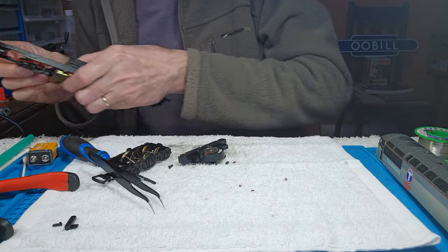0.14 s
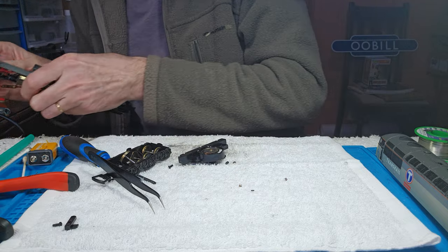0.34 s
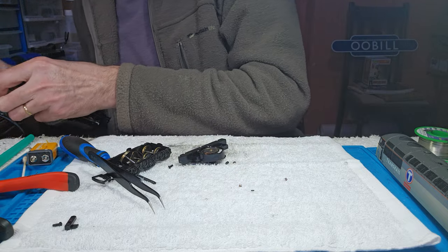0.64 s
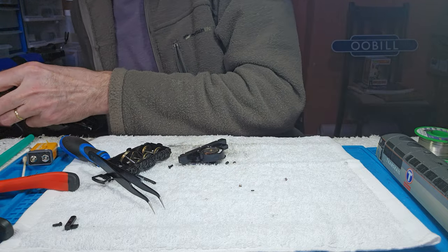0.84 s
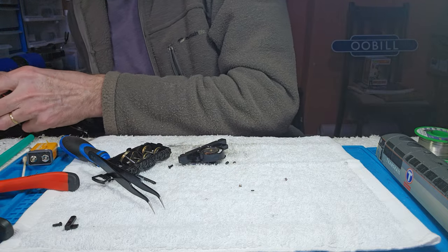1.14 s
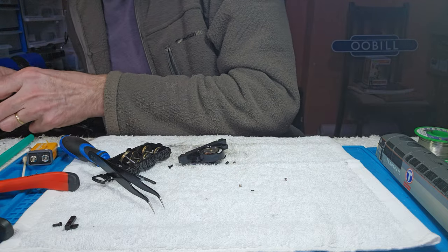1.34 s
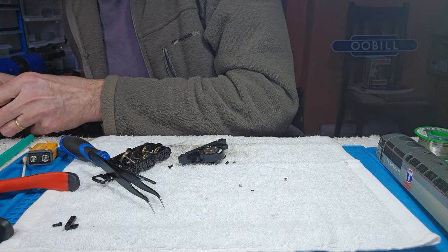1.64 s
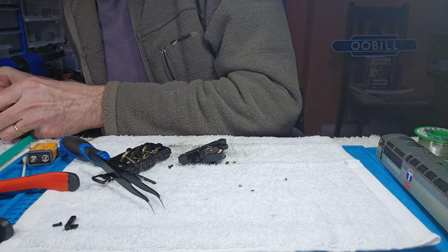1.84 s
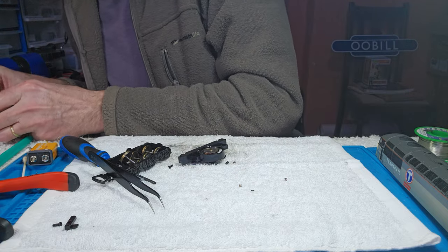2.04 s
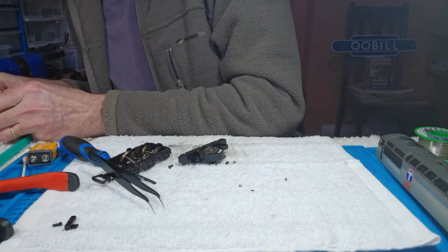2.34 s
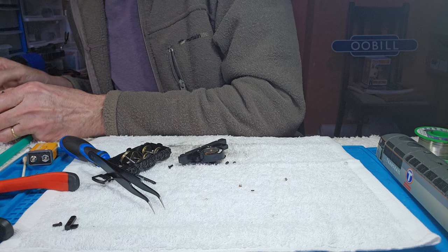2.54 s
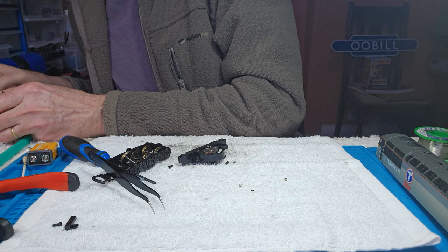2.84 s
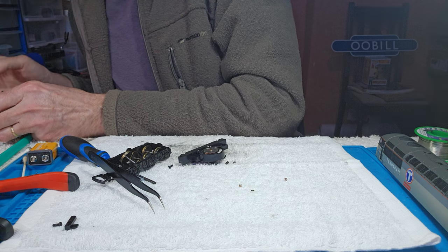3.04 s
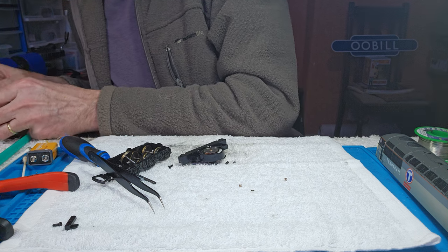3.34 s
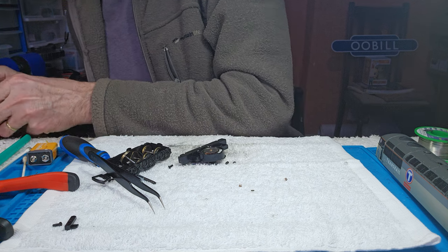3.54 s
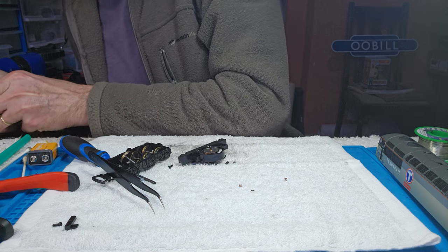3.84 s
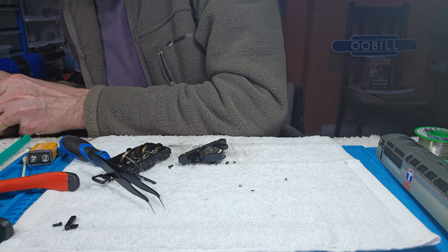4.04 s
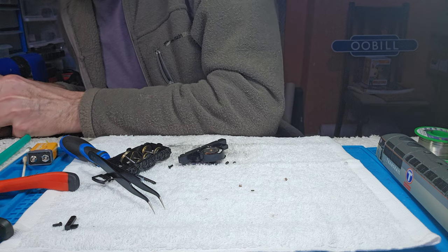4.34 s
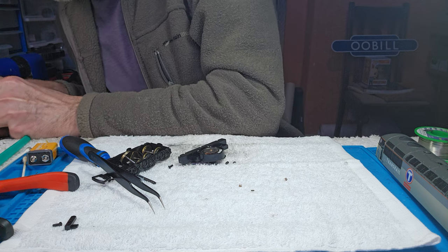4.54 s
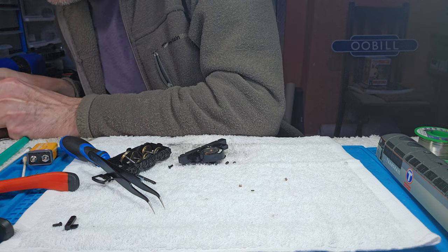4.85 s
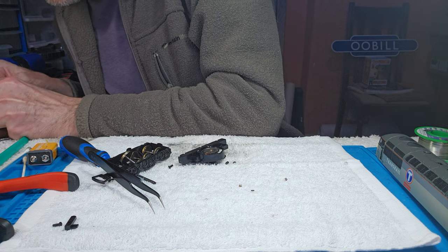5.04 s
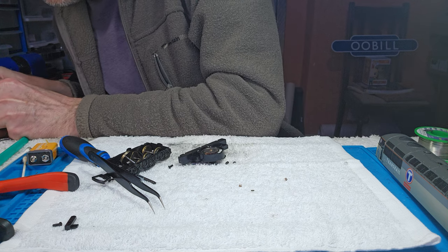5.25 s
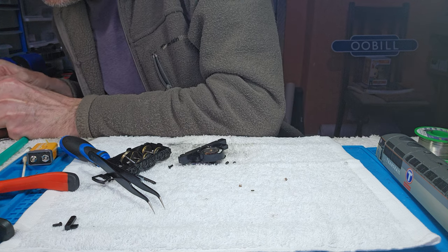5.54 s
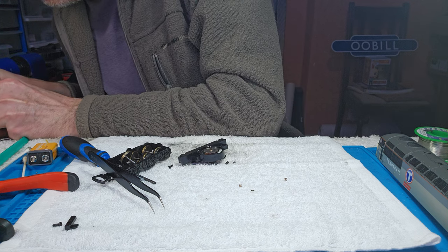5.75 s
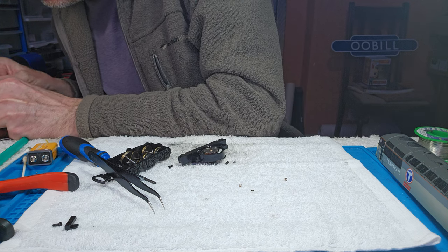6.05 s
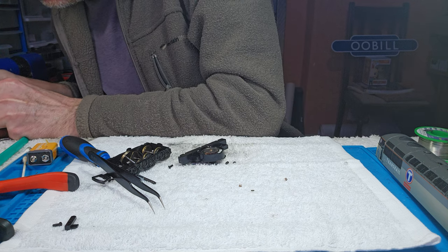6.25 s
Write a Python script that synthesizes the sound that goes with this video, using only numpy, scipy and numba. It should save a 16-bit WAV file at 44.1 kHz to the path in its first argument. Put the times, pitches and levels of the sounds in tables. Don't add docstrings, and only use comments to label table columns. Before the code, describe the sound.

Quiet rubbing and light metal ticks give way to hard, bright vise clanks around three seconds, then softer rattles and one sharp closing knock indoors.

```python
import sys
import numpy as np
from scipy import signal
from scipy.fft import rfft, irfft, next_fast_len
from scipy.io import wavfile
from scipy.ndimage import uniform_filter1d
from numba import njit

SR = 44100
rng = np.random.default_rng(int(sys.argv[2]) if len(sys.argv) > 2 else 0)


def unload_wav(signal):
    wavfile.write(
        sys.argv[1],
        SR,
        np.round(np.clip(np.atleast_2d(signal).T, -1, 1) * 32767).astype(np.int16),
    )


def invert_db(level):
    return 10 ** (np.asarray(level, dtype=float) / 20)


N = 282636
KNOCK_LEN = 9000
TAIL = 4096
BAR_CROWD_T60_S = .095

# pitch_hz, level_db, t60_s
BENCH_MODES = [(144, -0.5, .3), (241.4, -5, 0.17), (250.2, -3.5, 0.28), (331.7, -10, 0.11), (345, 6.5, 0.1),
               (427, -6.5, 0.29), (562.3, -13.5, .1), (673.5, -6.5, 0.13), (881, 4, 0.095)]
BODY_MODES = [(1381, 4.5, 0.023), (1656, -3, 0.11), (1947, -25.5, .06), (2455, -24.5, .06),
              (2760, -14.5, 0.11), (2820, -7.5, 0.083), (3414, -7, 0.011), (3900, -24.5, .07)]
BAR_MODES = [(7900, -15.5, 0.022), (8225, 1.5, .035), (10750, -3, 0.04), (10570, 1, 0.016),
             (13500, -19, .03), (15100, -9.5, .03)]
# (pitch_hz, level_db)
BODY_CROWD = (0.14, 1, [(600, -27), (1200, 5), (2100, 9), (2500, -1.5), (2850, 4.5), (3200, -3.5),
              (3700, 2), (4050, -5), (4400, -10.5), (6500, -21), (9000, -31.5)])
BAR_CROWD = (BAR_CROWD_T60_S, -1.5, [(4000, -32), (5200, -24), (6500, -8), (7700, 1.5), (8300, 11.5),
             (9600, -4), (10700, 9), (11600, -11), (13500, -7.5), (14500, -6), (15300, 1), (16000, -8.5)])


def unit(x):
    return x / np.sqrt(np.mean(x ** 2))


def add(out, sound, s, db):
    i = int(s * SR)
    out[:, i:i + KNOCK_LEN] += sound * invert_db(db) / np.abs(sound).max()


def envelope(points, **ends):
    return invert_db(np.interp(np.arange(N) / SR, *np.transpose(points), **ends))


def colour(points, size):
    hz, db = np.transpose(points)
    f = np.maximum(np.arange(size // 2 + 1) * SR / size, 1)
    return invert_db(np.interp(np.log(f), np.log(hz), db))


def hiss(points):
    span = next_fast_len(N, True)
    spectrum = rfft(rng.standard_normal((2, span))) * colour(points, span)
    return unit(irfft(spectrum, span)[:, :N])


@njit
def ring(x, pole, gain):
    out = np.zeros((2, len(x)))
    for m in range(len(pole)):
        z = 0j
        for i in range(len(x)):
            z = z * pole[m] + x[i]
            out[0, i] += (gain[0, m] * z).imag
            out[1, i] += (gain[1, m] * z).imag
    return out


def struck(x, modes, chance, scatter_db, unlike):
    hz, db, t60 = np.transpose(modes)
    life = np.maximum(t60, .003)
    detune, scatter, port_level, port_phase = chance[:4 * len(hz)].reshape(4, -1)
    pole = np.exp(2j * np.pi * hz * (1 + 0.006 * detune) / SR - np.log(1000) / (life * SR))
    weight = invert_db(db + min(scatter_db, 4) * scatter) / np.sqrt(life)
    ports = np.exp(np.outer([1, -1], unlike * (0.14 * port_level + 1j * port_phase)))
    return ring(x + 1e-18, pole, weight * ports)


def crowd(x, part, alike, size=TAIL):
    t60, db, points = part
    fade = np.exp(-np.log(1000) * np.arange(size) / SR / max(t60, .01))
    tail = rng.standard_normal((3, size)) * fade
    tail = alike * tail[0] + np.sqrt(1 - min(alike, 1) ** 2) * tail[1:]
    span = next_fast_len(len(x) + size, True)
    spectrum = rfft(x, span) * rfft(tail, span) * colour(points, span)
    return invert_db(db) * unit(irfft(spectrum, span)[:, :len(x)])


def chatter(length_s, chance, soft_s):
    t = np.arange(KNOCK_LEN) / SR
    fade = np.exp(-t / max(length_s, .0005)) + 9.2 * np.exp(-t / 0.0013)
    return chance * chance * chance * fade * (1 - np.exp(-t / soft_s))


def air():
    # pitch_hz, level_db (per Hz)
    air_colour = [(18, -9), (48, 14.5), (259, 9), (988, -24), (1190, -15), (5310, -20.5), (6380, -16.5),
                  (14800, -16), (16000, -19.5)]
    return hiss(air_colour) * invert_db(-71)


def room(vice):
    # (pitch_hz, level_db)
    echo = (0.36, -11.5, [(100, -7), (500, -6.5), (4000, -2.5), (6000, -7), (16000, -21)])
    treble_echo = (0.25, -20.5, [(3000, -40), (6000, -2.5), (16000, 0)])
    sent = vice.mean(axis=0)
    bright = signal.sosfilt(signal.butter(4, 5000, "high", fs=SR, output="sos"), sent)
    tail = crowd(sent, echo, 0.3, size=4 * TAIL) + crowd(bright, treble_echo, 0.22, size=4 * TAIL)
    return tail * vice.std()


def sleeve():
    # start_s, level_db
    moves = [
        [(0.0, -69.5), (0.11, -80.5), (0.148, -70.5), (0.296, -86.5), (0.318, -68), (0.46, -94), (0.632, -101),
         (0.638, -80.5), (0.8, -104)],
        [(1.19, -76), (1.27, -84), (1.28, -71), (1.5, -95), (1.63, -72.5), (1.89, -66.5)],
        [(1.9, -66), (1.93, -73), (2.266, -65), (2.372, -76), (2.394, -65), (2.4, -108)],
        [(3.58, -72.5), (3.738, -75), (3.756, -69), (3.78, -55)],
        [(2.56, -90), (2.562, -66), (2.59, -80)],
        [(5.531, -90), (5.535, -56.5), (5.575, -70)],
        [(3.9, -92), (3.905, -70), (3.93, -82)],
    ]
    # pitch_hz, level_db (per Hz)
    cloth_colour = [(590, -47), (1000, -19.5), (1250, -3.5), (2250, 5), (2710, 3.5), (4070, 9), (5570, 2),
                    (16000, -8.5)]
    gain = sum(envelope(move, left=-120, right=-120) for move in moves)
    return hiss(cloth_colour) * uniform_filter1d(gain, 600) * invert_db(8.0)


def slip():
    # centre_s, half_length_s, level_db, lowest_hz
    puff = (.165, .035, -60, 12000)
    s, half_s, db, hz = puff
    shape = np.exp(-((np.arange(N) / SR - s) / half_s) ** 2)
    return hiss([(0.24 * hz, -25), (hz, -6), (16000, 0)]) * invert_db(db) * shape


def carry():
    # start_s, level_db
    hum_level = [(0, -60), (.09, -63.5), (0.151, -54.5), (.2, -58.5), (.23, -80), (.26, -62.5), (.34, -71),
                 (.4, -67.5), (.8, -89)]
    # pitch_hz, level_db, t60_s
    hum_modes = [(370, 1.5, 0.061), (442.5, -3, 0.041), (740, -12.5, 0.05), (1235, -1.5, .04),
                 (1500, -11.5, 0.058), (2050, -8, .06)]
    hum = unit(struck(rng.standard_normal(N), hum_modes, rng.standard_normal(24), 0, 0.33))
    return hum * envelope(hum_level, right=-120)


def all_knocks():
    # start_s, body_peak_db, bench_db, bar_db (above body), chatter_s
    slams = [(2.4118, -20, -11, -7.5, 0.011), (2.6877, -23.5, -2.5, -16.5, 0.0065),
             (2.767, -22.5, -6.5, -30, 0.013), (2.7783, -23.5, -6.5, -54, 0.028),
             (2.9262, -19, -8, -37.5, 0.0049), (2.953, -10.5, -12, -15, 0.018),
             (2.9838, -11.5, -13.5, -15.5, 0.015), (3.204, -11, -7.5, -11, 0.025),
             (3.264, -4, -19, -22, 0.0074), (3.301, -15, -8, -14.5, 0.014), (3.5062, -22, -9, -42, 0.0041),
             (5.072, -22, -9, -48.5, 0.013), (5.0864, -24, -10.5, -28, 0.0074),
             (5.3875, -22.5, -12, -50.5, 0.0027), (5.4888, -25.5, -10, -21.5, 0.0061),
             (5.995, -23, -8.5, -15, 0.0051), (6.325, -10.5, -9, -36.5, 0.0055)]
    # start_s, body_peak_db, bar_db (above body), chatter_s
    clacks = [(0.0464, -53.5, -10, 0.0041), (.6394, -69, -2, 0.0079), (1.275, -49.5, -7, 0.037),
              (1.345, -37.5, -15.5, .04), (1.417, -33, -17, .015), (1.523, -46.5, -17, .0051),
              (1.715, -35, -20.5, .02), (1.8085, -34, -1, .0033), (1.841, -29, -23.5, .0093),
              (2.1434, -32, -17, .0074), (2.363, -50.5, -7.5, .005), (3.1209, -27.5, -6, .0041),
              (3.7208, -31.5, -10, 0.011), (3.786, -27, -9.5, 0.014), (4.033, -53, -12, .0084),
              (4.0552, -36.5, -17.5, 0.0089), (4.4885, -56.5, -15, 0.0062), (4.7803, -35, -9, .016),
              (4.858, -41.5, -2, 0.0059), (5.104, -51.5, -0.5, .015), (5.5336, -23, -31, 0.0084),
              (5.7204, -25, -20, .0071), (6.3418, -34, -2.5, .011)]
    # start_s, body_peak_db, upper_body_db (above body), chatter_s
    jaw_taps = [(0.312, -55, -33, 0.022), (1.3194, -33.5, -17.5, 0.0061), (1.600, -37, -20, 0.0059),
                (1.621, -33, -22, .011), (1.9092, -49.5, -20, 0.0075), (2.5294, -25.5, -9, .0033),
                (3.494, -30, 4, .0079), (4.2527, -38, 2, .014), (4.4322, -52.5, -15.5, 0.013),
                (4.6058, -50, 6, 0.024), (4.7001, -50, -13, 0.007), (4.787, -29, -16, 0.017),
                (4.8987, -25.5, -18.5, 0.003), (5.0117, -28.5, -17, 0.0069), (5.3788, -34.5, -19, 0.011),
                (5.577, -26.5, -12, .0058), (5.632, -28, -20, .0077), (5.6449, -30, -18.5, .0049),
                (6.132, -47.5, -27, .0062), (6.188, -39, -14.5, .012)]
    # start_s, body_peak_db, bench_db (above body), chatter_s
    thumps = [(0.8212, -64, 9.5, 0.016), (.853, -52, 2.5, 0.0085), (0.957, -61, 11, 0.016),
              (1.1004, -79.5, 25.5, .0066), (1.194, -38.5, -2, .0079), (1.6576, -38.5, -1.9, .03),
              (1.7601, -38.5, -7, .0091), (1.8715, -39, -2.5, .0033), (1.9833, -45, -6, .015),
              (2.5577, -50, -8.5, .0049), (3.433, -33.5, -1.5, .0045), (3.598, -42, 4, .0034),
              (3.951, -42, -5, 0.0056), (4.2875, -38, -13.5, 0.012), (4.8207, -24.5, -5.5, .014),
              (4.9622, -55, 8.5, .006), (5.032, -31.5, 1.5, .027), (5.1894, -48.5, 10.5, .0058),
              (5.3382, -40.5, -1, .0088), (5.9052, -51.5, 11, .0073), (5.925, -44.5, -1, 0.0083),
              (6.1449, -38.5, -2.5, 0.0055), (6.235, -45, 7.5, .005), (6.285, -44.5, -3, .0066)]
    rows = []
    for s, db, bench_db, bar_db, chatter_s in slams:
        upper_db = 1.5 + 0.196 * db + 0.15 * bar_db
        rows.append((s, db, bench_db, bar_db, upper_db, chatter_s))
    for s, db, bar_db, chatter_s in clacks:
        rows.append((s, db, -7.5, bar_db, 2 + 0.95 * bar_db, chatter_s))
    for s, db, upper_db, chatter_s in jaw_taps:
        rows.append((s, db, -8.5, -34.5, upper_db, chatter_s))
    for s, db, bench_db, chatter_s in thumps:
        rows.append((s, db, bench_db, -31.5, -19 - 0.55 * bench_db, chatter_s))
    return sorted(rows)


def shudder(s, blow_db, above_db, rise_s, fall_s):
    blows, t = np.zeros(N), np.arange(SR // 2) / SR
    blows[(s * SR).astype(int)] = invert_db(blow_db + above_db)
    shape = (1 - np.exp(-t / rise_s)) * np.exp(-t / fall_s)
    return signal.fftconvolve(blows, shape / shape.max())[:N]


def rub_gains():
    # start_s, hand_weight_db, screw_slide_db
    handling = [(0.0, -64, -71.5), (.75, -80, -89.5), (1.0, -76, -100), (1.25, -53, -75), (1.4, -49, -69),
                (1.85, -66, -69), (2.21, -52.5, -64.5), (2.36, -71, -96), (2.6, -43, -83),
                (3.161, -52, -55.5), (3.46, -45, -90), (3.73, -41, -58.5), (4.32, -57, -76),
                (4.5, -60, -78.5), (4.73, -84, -69.5), (5.001, -68, -83.5), (5.499, -62.5, -69.5),
                (5.87, -58.5, -82), (6.41, -42.5, -49.5)]
    rub_db = (-13.5, -1.7, 5, -12)
    # level_db (above the blow), rise_s, fall_s
    shudders = [(-2, 0.027, 0.06), (-20, 0.018, 0.059), (-34, .01, .03), (-37.5, .01, .03)]
    # start_s, peak_db
    sways = [(0.843, -45), (1.014, -51), (1.101, -61.5), (1.19, -59), (1.319, -47), (1.429, -48),
             (1.631, -42), (1.851, -48.5), (1.949, -50), (2.179, -45), (2.411, -37.5), (2.531, -44.5),
             (2.692, -25), (2.774, -32.5), (2.96, -27), (3.208, -23), (3.269, -28), (3.509, -40.5),
             (3.791, -49), (4.269, -57), (4.47, -55), (4.818, -42), (5.09, -32), (5.187, -49.5),
             (5.391, -37.5), (5.532, -47), (5.729, -36.5), (5.997, -45), (6.193, -46), (6.328, -35.5)]
    s, weight_db, slide_db = np.transpose(handling)
    at, db, bench_db, bar_db = np.transpose(all_knocks())[:4]
    controls = (weight_db, weight_db, slide_db, slide_db)
    blows = (np.transpose(sways), (at, db + bench_db), (at, db), (at, db + bar_db))
    gains = []
    for control, above_db, blow, after in zip(controls, rub_db, blows, shudders):
        held = envelope(np.transpose([s, control + above_db]))
        gains.append(np.hypot(held, shudder(*blow, *after)))
    return gains


def rubbing():
    # pitch_hz, level_db, t60_s
    boom_modes = [(58, -1, 0.57), (133.3, 8, 1), ]
    # (pitch_hz, level_db)
    murmur = (0.35, 0.1, [(40, -15.5), (200, -7), (380, 6.5), (600, -8), (900, -9.5), (1300, -9.5),
              (2200, -24), (2800, -52)])
    rub_apart = (0.27, 0.16, 0.17, .15)
    t60, crowd_db, points = BODY_CROWD
    soft_body = (t60, crowd_db, [(hz, d - 3.6 * np.log2(hz / 2000)) for hz, d in points])
    parts = zip((boom_modes, BENCH_MODES[1:], BODY_MODES, BAR_MODES),
                (murmur, murmur, soft_body, BAR_CROWD),
                rub_gains(),
                (0.42, 0.21, .6, .9),
                (8.0, -0.5, 5.5, -29.5),
                rub_apart)
    out = 0
    for modes, dense, gain, unlike, clear_db, apart in parts:
        grit = rng.standard_normal(N) * invert_db(3.53 * np.minimum(rng.exponential(size=N), 5.5))
        damped = [(hz, d, 0.31 * t) for hz, d, t in modes]
        clear = struck(grit, damped, rng.standard_normal(64), 1.5, unlike)
        clear = clear + apart * np.outer([1, -1], np.roll(clear[0], SR))
        sound = invert_db(clear_db) * unit(clear) + crowd(grit, dense, 0.77)
        out = out + unit(sound) * gain
    return out


def squeaks():
    # start_s, length_s, start_hz, end_hz, level_db
    songs = [(.90, 0.013, 2870, 2860, -64.5), (1.184, 0.025, 2920, 3020, -71),
             (1.32, 0.0095, 2890, 2870, -52), (1.335, 0.0061, 2850, 2870, -48),
             (1.352, 0.0078, 2900, 2850, -48), (1.367, .012, 2750, 2780, -54),
             (1.391, .015, 2750, 2760, -57), (1.412, .02, 2910, 2790, -50.5),
             (1.357, 0.037, 3980, 4030, -64), (1.426, 0.025, 3990, 4016, -50.5),
             (1.449, 0.02, 4000, 4040, -57), (1.62, 0.012, 2820, 2850, -51),
             (1.732, 0.028, 2910, 2730, -52.5), (1.809, 0.018, 2925, 2760, -43.5),
             (1.807, 0.029, 4020, 4020, -58.5), (1.869, 0.013, 2910, 2865, -43.5),
             (2.209, .14, 4070, 3900, -63.5), (2.3, 0.07, 2710, 2720, -64.5),
             (3.625, 0.085, 5000, 5100, -61.5), (3.788, 0.045, 4000, 4010, -56),
             (4.25, 0.048, 2840, 2768, -56), (4.689, 0.025, 2790, 2860, -64.5),
             (6.131, .045, 2840, 3020, -55), (6.28, 0.045, 2980, 3100, -54.5),
             (1.522, 0.0071, 2900, 2800, -57.5), (1.52, 0.019, 3980, 3977, -63),
             (5.906, 0.019, 2876, 2873, -61)]
    size = 16384
    out, t = np.zeros(N + size), np.arange(size) / SR
    for s, length_s, start_hz, end_hz, db in songs:
        waver, throb = uniform_filter1d(rng.standard_normal((2, size)), 160) * np.sqrt(160)
        glide = start_hz + (end_hz - start_hz) * np.minimum(t / length_s, 1)
        hz = glide * (1 + (.004 + .16 * length_s) * np.clip(waver, -2, 2))
        release = np.exp(-np.maximum(t - length_s, 0) / 0.003)
        shape = (1 - np.exp(-t / .002)) * release * invert_db(4.5 * throb)
        i = int(s * SR)
        out[i:i + size] += invert_db(db + 0.5) * shape * np.sin(2 * np.pi * np.cumsum(hz) / SR)
    return out[:N]


def ticks():
    # start_s, peak_db, centre_hz
    contacts = [(.048, -51, 3600), (.15, -67, 1500), (.178, -61, 1500), (.312, -58.5, 800),
                (.322, -53.5, 1240), (0.325, -52, 1500), (.348, -60, 2000), (1.275, -48.5, 6200),
                (1.285, -57, 5200), (2.781, -27.5, 3003), (2.784, -21.5, 2207), (3.735, -49.5, 6200),
                (3.752, -55, 5300), (3.765, -54.5, 6000), (5.535, -39.5, 10480), (5.366, -53.5, 6040),
                (4.612, -52.5, 3000), (1.354, -45, 2840), (2.9555, -7.5, 3600), (1.811, -30, 2900),
                (3.2073, -24.5, 5490), (3.266, -18, 5510), (3.28, -28, 5565), (3.712, -50, 2498),
                (3.729, -36, 2844), (3.77, -44.5, 3005), (4.604, -44, 4980), (4.7806, -41, 2924),
                (4.789, -33, 3500), (4.8078, -30.5, 1822), (4.8212, -32.5, 3306), (4.829, -35.5, 1902),
                (4.861, -41.5, 2900), (4.9005, -33, 3316), (4.905, -28, 1900), (5.0108, -39.5, 3297),
                (5.0727, -27, 3340), (5.0846, -26.5, 3604), (5.104, -43, 7025), (5.388, -29, 3050),
                (5.393, -26, 2197), (5.4881, -32.5, 3405), (5.496, -42, 8520), (5.496, -41, 10810),
                (5.536, -35, 2897), (5.578, -33, 3048), (5.6323, -34.5, 2804), (5.6468, -35, 3000),
                (5.711, -49.5, 7540), (5.725, -33, 2900), (2.529, -30.5, 3000), (2.530, -43.5, 6200),
                (3.1234, -33.5, 2900), (1.421, -36, 1500), (6.304, -45.5, 3008), (6.235, -53.5, 3000),
                (6.19, -49.5, 3200), (5.364, -48, 2990), (5.579, -32.5, 1800), (3.955, -48, 3200)]
    out = np.zeros((2, N + KNOCK_LEN))
    for s, db, hz in contacts:
        blow = chatter(.0007, rng.standard_normal(KNOCK_LEN), .0004)
        chance = rng.standard_normal(25)
        modes = [(hz * np.exp(.1 * c), 0, 30 / hz) for c in chance[20:]]
        skirt = signal.butter(2, 0.8 * hz, fs=SR, output="sos")
        add(out, signal.sosfilt(skirt, struck(blow, modes, chance, 3, 0.63)), s - .0005, db + 2.0)
    return out[:, :N]


def rings():
    # start_s, mode, peak_db, t60_s
    square_blows = [(1.808, "bar", -34.5, .035), (2.7, "slide", -27.5, 0.049), (2.412, "knob", -23, .04),
                    (2.955, "slide", -11.5, 0.044), (2.957, "bar", -20, .25), (3.206, "knob", -18, .035),
                    (3.264, "jaw", -4.5, 0.1), (3.786, "bar", -27.5, .05), (4.789, "knob", -42.5, .05),
                    (5.086, "slide", -32.5, .11), (5.994, "bar", -50, 0.069), (3.724, "knob", -40.5, .04),
                    (3.721, "bar", -36, .03), (6, "pin", -40, .03), (5.721, "pin", -36.5, .06),
                    (3.509, "bar", -44, .07), (5.012, "slide", -47.5, 0.074), (6.342, "slide", -30, .04),
                    (2.956, "pin", -24.5, .06), (3.208, "pin", -22, .07), (3.266, "pin", -20.5, .08),
                    (3.301, "pin", -25, .04), (2.692, "pin", -33.5, .09), (6.342, "pin", -34, .04),
                    (2.985, "bar", -25, 0.25), (4.056, "bar", -46, .04)]
    ring_hz = {"jaw": 2724, "slide": 3600, "pin": 8300, "bar": 10600, "knob": 15150}
    out = np.zeros((2, N + KNOCK_LEN))
    for s, mode, db, t60 in square_blows:
        hz = ring_hz[mode]
        blow = chatter(.002, rng.standard_normal(KNOCK_LEN), 0.00014)
        twins = [(hz, 0, t60), (.975 * hz, -7, .4 * t60)]
        sound = struck(blow, twins, 0.24 * rng.standard_normal(8), 1.5, 0.98)
        left_db = -13 if mode == "knob" else 0
        add(out, sound * invert_db([[left_db], [0]]), s, db)
    return out[:, :N]


def knocks():
    # (pitch_hz, level_db)
    bench_crowd = (0.23, 0.5, [(60, -34.5), (200, 6), (350, 8), (900, 6), (1300, -2), (2200, -11),
                   (2700, -41.5), (6000, -72)])
    out = np.zeros((2, N + KNOCK_LEN))
    t60, crowd_db, points = BODY_CROWD
    skirt = signal.butter(4, 4370, fs=SR, output="sos")
    for s, db, bench_db, bar_db, upper_db, length_s in all_knocks():
        grain, chance = rng.standard_normal(KNOCK_LEN), rng.standard_normal((3, 64))
        thud = chatter(1.2 * length_s, grain, 0.0036)
        blow = chatter(length_s, grain, 0.0002 + 0.11 * length_s)
        tick = chatter(2.35 * length_s, grain, .0001)
        tilt_db = 0.66 * (upper_db + 9.5)
        modes = [(hz, d + tilt_db * np.log2(hz / 2000), t) for hz, d, t in BODY_MODES]
        dense = (t60, crowd_db, [(hz, d + tilt_db * np.log2(hz / 2000)) for hz, d in points])
        bench = unit(struck(thud, BENCH_MODES, chance[0], 9.0, 0.075)) + crowd(thud, bench_crowd, 0.87)
        body = unit(signal.sosfilt(skirt, struck(blow, modes, chance[1], 7.5, 0.94)))
        body = body + crowd(blow, dense, 0.55)
        bar = unit(struck(tick, BAR_MODES, chance[2], 1.0, 0.97)) + crowd(tick, BAR_CROWD, 0.37)
        add(out, bench, s - .002, db + bench_db + 7.0)
        add(out, body, s - .001, db + 1.1)
        add(out, bar, s, db + bar_db + 8.5)
    return out[:, :N]


def scene():
    song = squeaks()
    to_walls = .4
    port_lag = 14
    vice = knocks() + rings() + ticks() + to_walls * song
    direct = vice + (1 - to_walls) * song + rubbing() + carry()
    direct[0] = np.pad(direct[0], (port_lag, 0))[:N]
    return direct + room(vice) + sleeve() + air() + slip()


def band_limit(x):
    return signal.sosfilt(signal.butter(12, 16990, fs=SR, output="sos"), x)


def record(dry):
    bass_cut = signal.butter(1, 129, "high", fs=SR, output="sos")
    rumble_cut = signal.butter(2, 46.5, "high", fs=SR, output="sos")
    top_cut = signal.ellip(6, .5, 40, 15720, fs=SR, output="sos")
    heard = signal.sosfilt(np.vstack([bass_cut, rumble_cut, top_cut]), dry)
    mix = np.tanh(0.73 * heard) / 0.68
    return band_limit(mix)


dry = scene()
out = record(dry)
unload_wav(out)
```